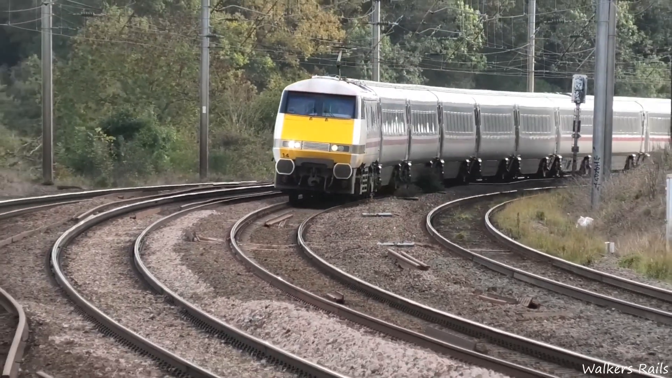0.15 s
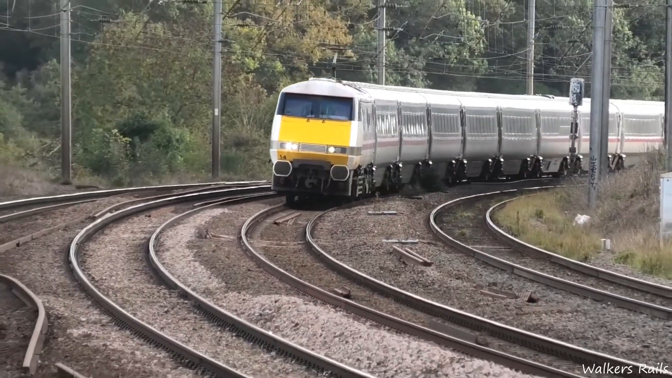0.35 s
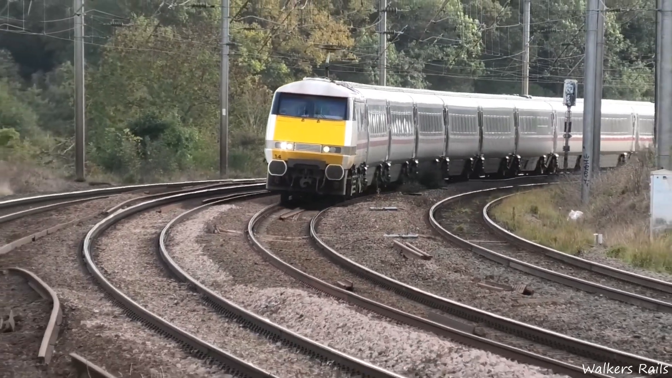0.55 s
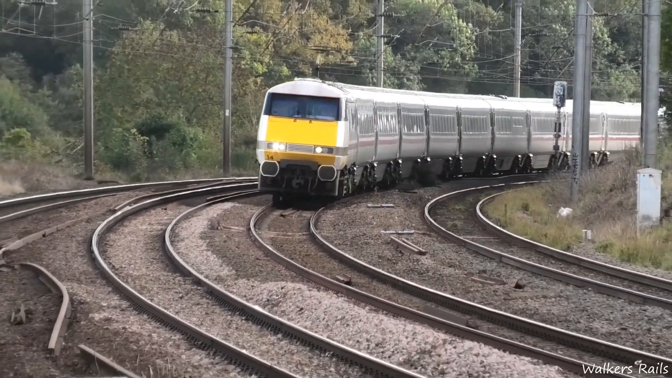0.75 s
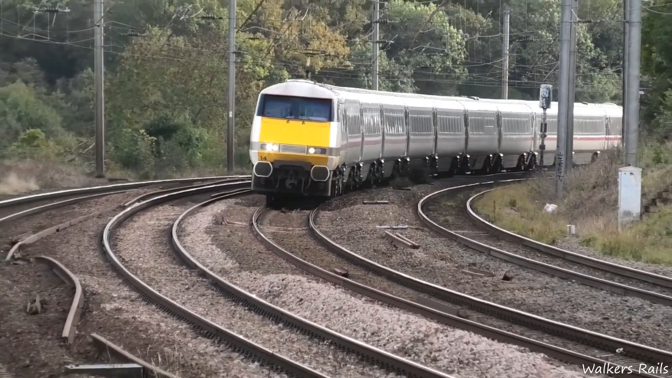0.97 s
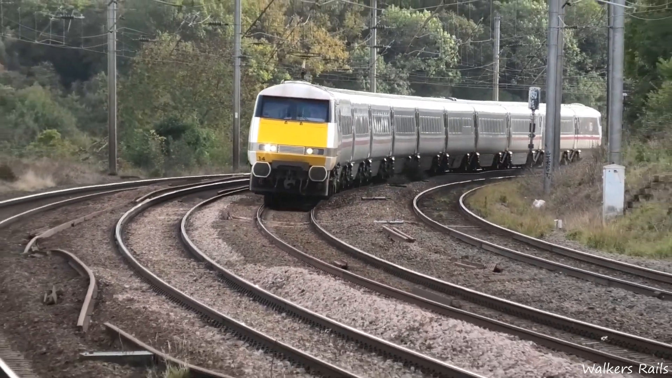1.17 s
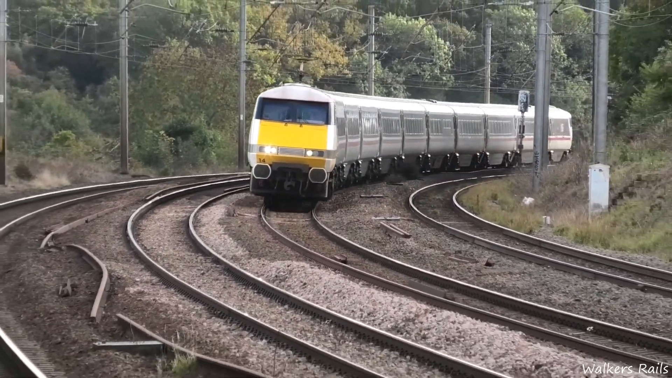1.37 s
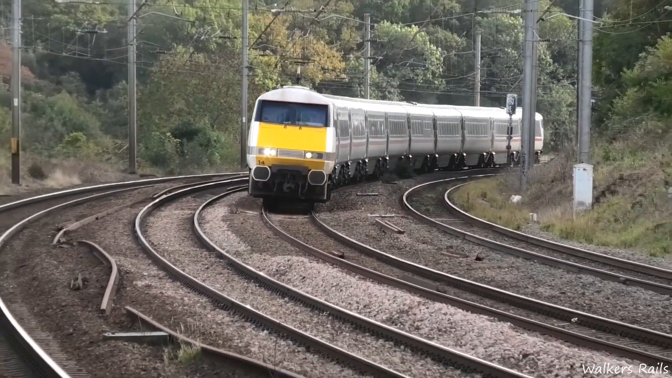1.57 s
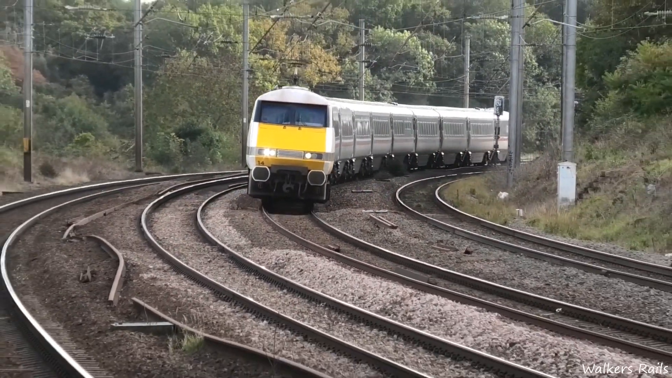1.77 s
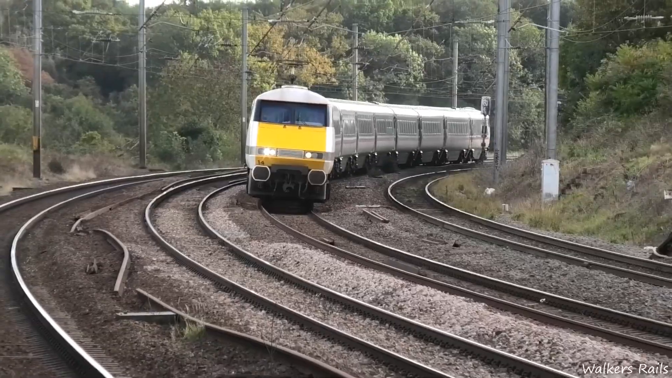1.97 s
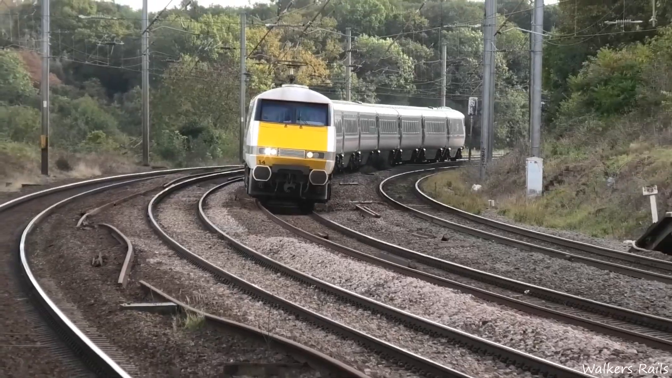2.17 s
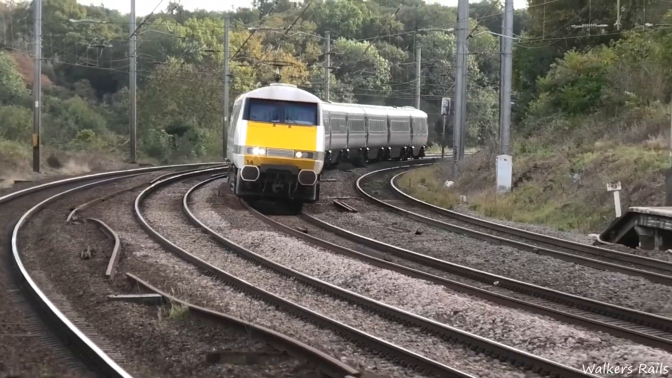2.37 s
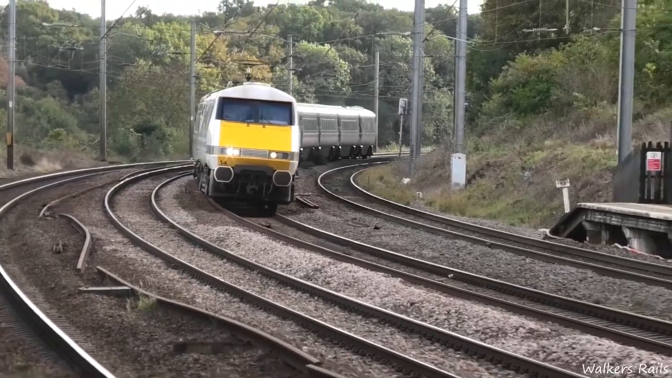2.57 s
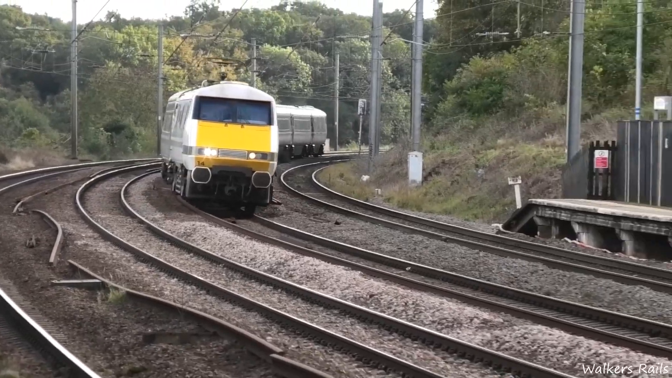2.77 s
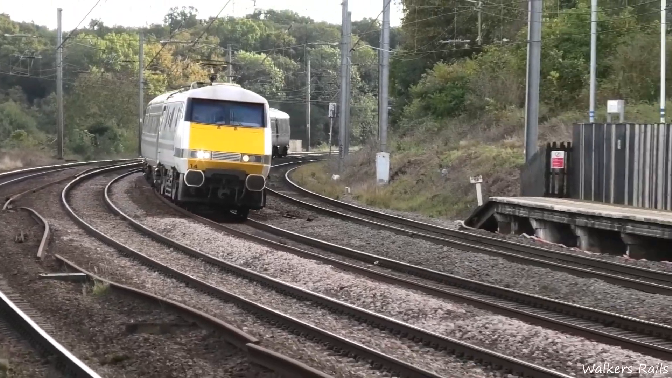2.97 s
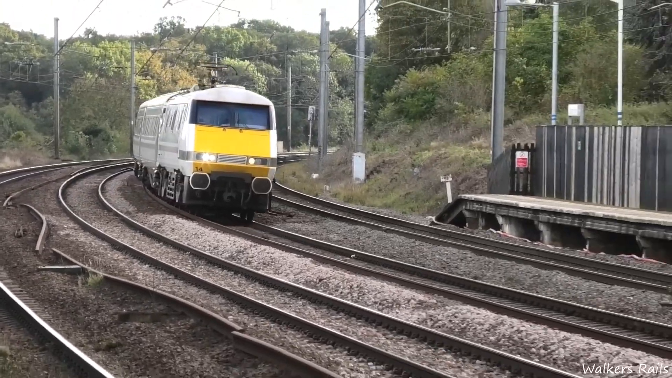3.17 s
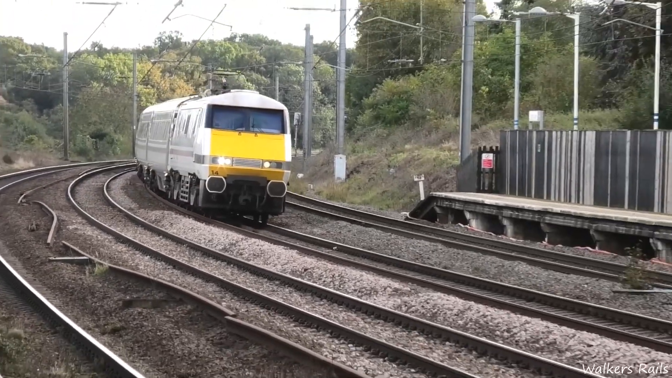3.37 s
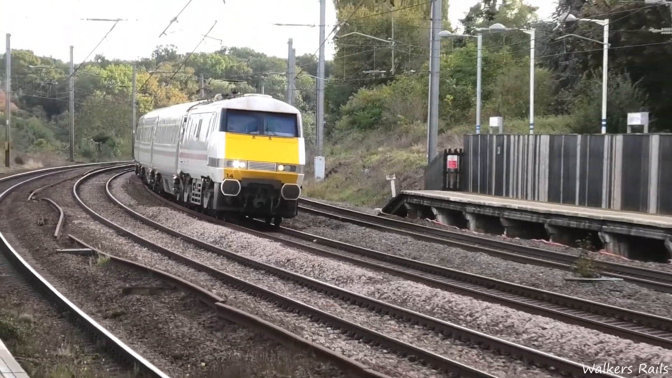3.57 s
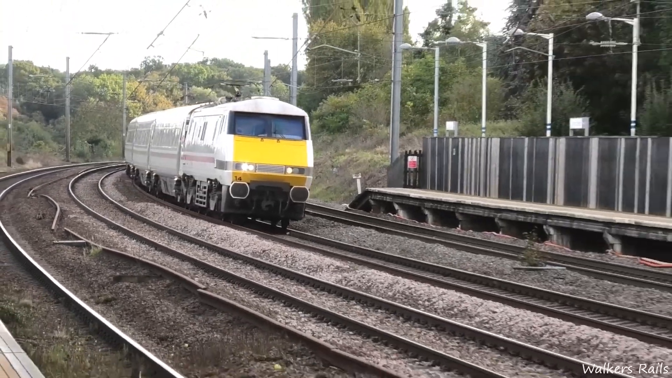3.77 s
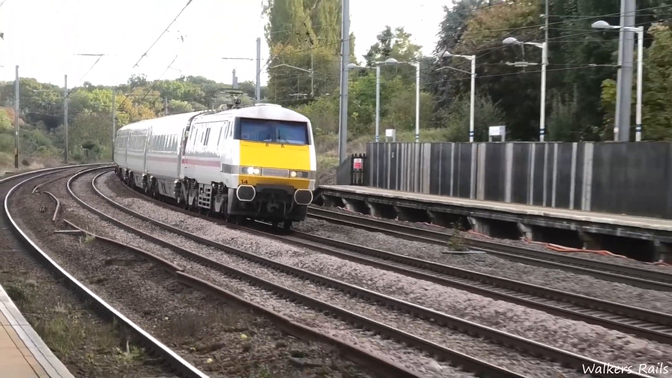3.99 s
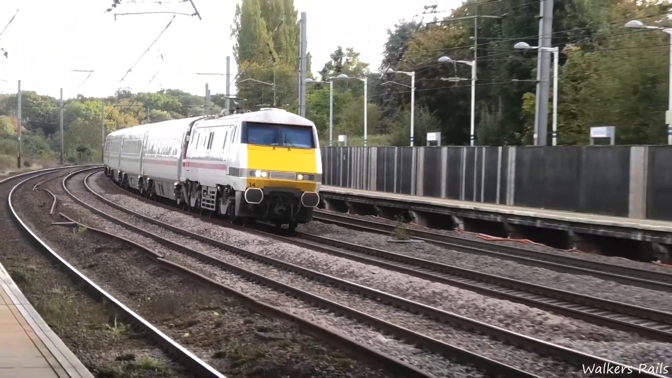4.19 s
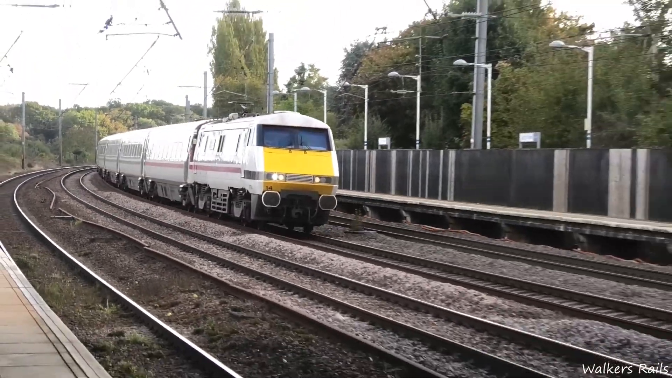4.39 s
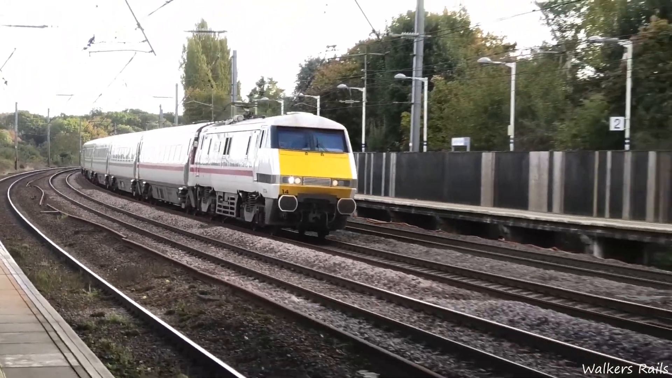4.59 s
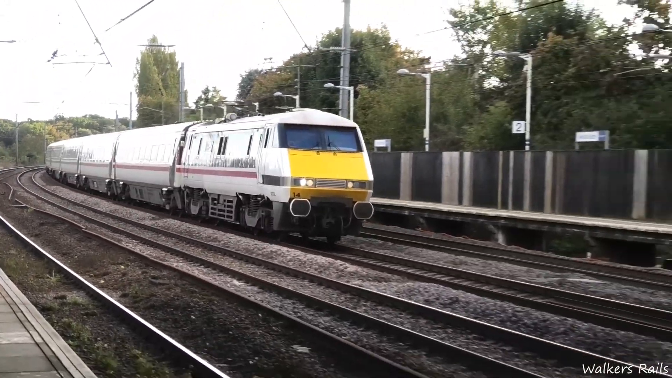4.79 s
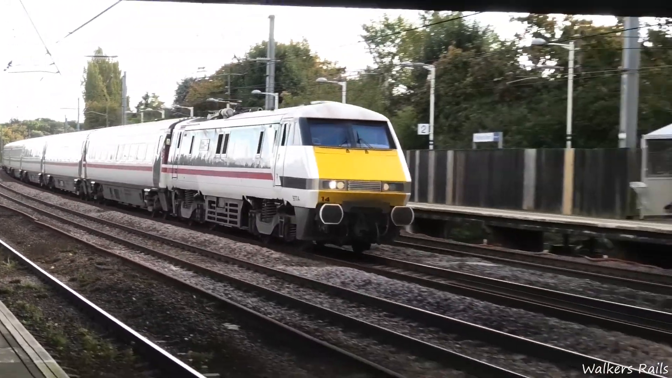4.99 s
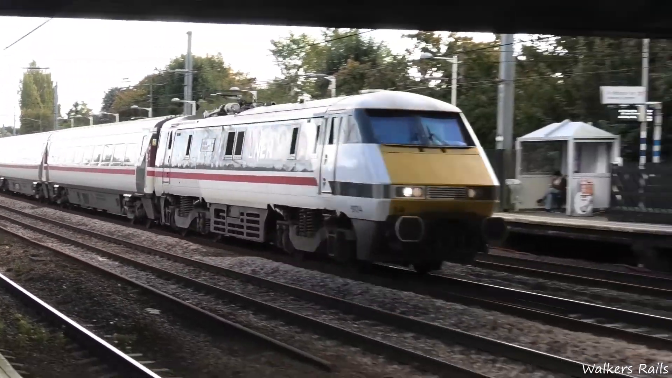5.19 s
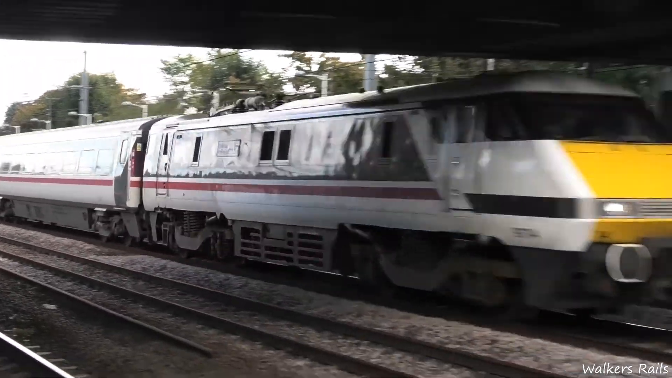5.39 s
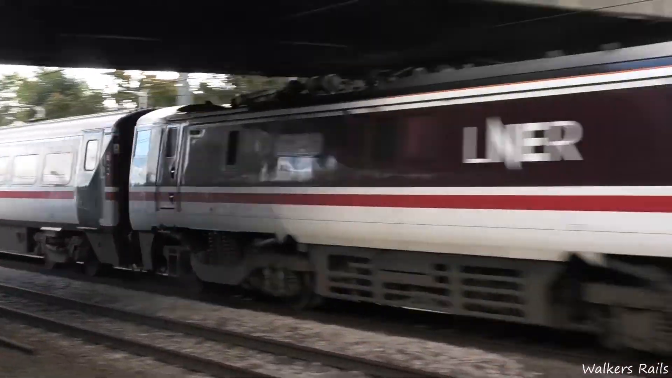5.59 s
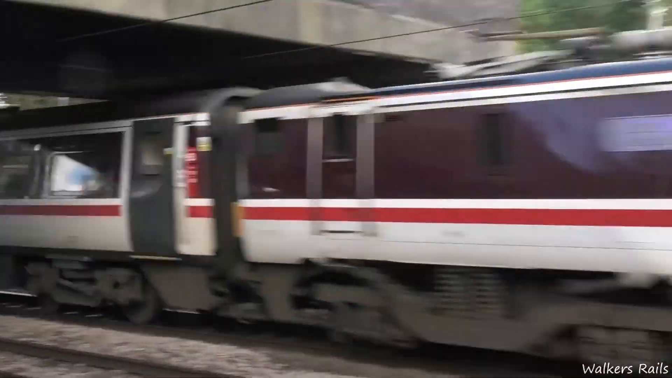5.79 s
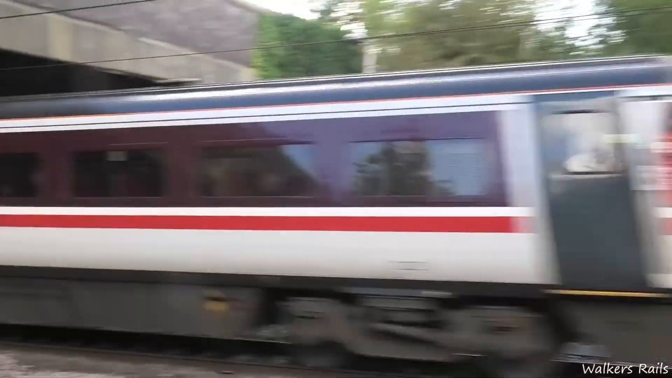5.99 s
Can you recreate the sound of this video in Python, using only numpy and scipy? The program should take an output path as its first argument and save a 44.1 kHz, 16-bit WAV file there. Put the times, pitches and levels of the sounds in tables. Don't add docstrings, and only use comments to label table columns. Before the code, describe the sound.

A distant rail hum and low rumble build into a loud, overloading rush as an express train sweeps by very close, its wheel tones dropping.

```python
import sys
import numpy as np
from scipy import signal
from scipy.io import wavfile
from scipy.ndimage import uniform_filter1d

SR = 44100
rng = np.random.default_rng(int(sys.argv[2]) if len(sys.argv) > 2 else 0)


def attenuation_scalar(level_db):
    decades = np.asarray(level_db, float) / 20
    return 10 ** decades


def store_pcm(level_fs):
    pcm = np.round(np.clip(level_fs, -1, 1) * 32767).astype(np.int16)
    wavfile.write(sys.argv[1], SR, np.atleast_2d(pcm).T)


N = 266364
TIME = np.arange(N) / SR
FRAME, HOP = 2048, 512
STEADY = 0.3


def set_rms(x, db):
    return x * attenuation_scalar(db) / np.sqrt(np.mean(x ** 2))


def swell(t, length_s):
    return np.exp(-0.5 * ((TIME - t) / (0.43 * length_s)) ** 2)


def walk(rate_hz, count):
    hold = int(SR / rate_hz / HOP) + 1
    steps = rng.standard_normal((count, N // HOP // hold + 3))
    x = np.repeat(steps, hold, axis=1)
    x = uniform_filter1d(uniform_filter1d(x, hold, axis=1), hold, axis=1)
    return x[:, :N // HOP + 3] / x.std()


def coloured(spectrum, lo_hz, hi_hz, patchy_db, flicker_db, loss_db_per_khz=None):
    hz, t, z = signal.stft(rng.standard_normal(N), SR, nperseg=FRAME, noverlap=FRAME - HOP)
    f, db = np.transpose(spectrum)
    db = np.interp(np.log(hz + 1), np.log(f), db)
    inside = (hz > lo_hz) & (hz < hi_hz)
    db -= 10 * np.log10(np.sum(attenuation_scalar(2 * db[inside])) / len(hz))
    band = (np.sqrt(hz) / 5).astype(int)
    wander = patchy_db * walk(6, count=30) + flicker_db * walk(20, count=30)
    db = db[:, None] + wander[band, :len(t)]
    if loss_db_per_khz is not None:
        khz_above = hz / 1000 - lo_hz / 500
        db = db - np.outer(khz_above, np.interp(t, TIME, loss_db_per_khz))
    return signal.istft(z * attenuation_scalar(db), SR, nperseg=FRAME, noverlap=FRAME - HOP)[1][:N]


def resonance(hz, width_hz, steady):
    step = 16
    sos = signal.butter(3, width_hz / 2, fs=SR / step, output="sos")
    slow = signal.sosfilt(sos, rng.standard_normal((2, 2 * N // step)))
    slow = slow[:, -(N // step + 2):]
    slow = slow / (np.hypot(*slow) + 1e-9) ** steady
    a, b = (np.interp(TIME, np.arange(len(v)) * step / SR, v) for v in slow)
    phase = 2 * np.pi * np.cumsum(hz * np.ones(N)) / SR
    return set_rms(a * np.cos(phase) + b * np.sin(phase), 0)


def heard(alongside_db, arrives_s, spread_db, shade_db_per_m, floor_db, surges=()):
    speed_m_s, platform_m = 38.55, 8.36
    metres = np.hypot(speed_m_s * np.maximum(arrives_s - TIME, 0), platform_m)
    db = alongside_db - spread_db * np.log10(metres / platform_m)
    db = db - shade_db_per_m * (metres - platform_m)
    db = 10 * np.log10(attenuation_scalar(2 * db) + attenuation_scalar(2 * floor_db))
    return db + sum(lift_db * swell(t, length_s) for t, length_s, lift_db in surges)


def facing():
    return swell(2.77, 1.73)


def fields():
    # [f/Hz, level/dB per Hz]
    murmur = [(13, -45), (22, -9), (76, -22), (222, -26), (285, -1), (493, 16.5), (649, -8), (854, -25),
              (1480, -30), (2870, -10), (4230, -44), (5200, -63), (6760, -81), (11400, -120)]
    return set_rms(coloured(murmur, 22, 15000, patchy_db=1.0, flicker_db=0.51), -44.5)


def sparks():
    # [t/s, length/s, f/Hz, width/Hz, level/dB]
    arcs = [
        (3.111, .04, 13000, 4000, -78),
        (3.21, .035, 13500, 4000, -75),
        (3.385, .09, 13100, 500, -75),
        (3.375, .07, 13000, 4500, -76),
    ]
    out = 0
    for t, length_s, hz, width_hz, db in arcs:
        sos = signal.butter(2, [hz - width_hz / 2, hz + width_hz / 2], "band", fs=SR, output="sos")
        hiss = set_rms(signal.sosfilt(sos, rng.standard_normal(N)), db)
        out = out + swell(t, length_s) * hiss
    return out


def wire():
    # [f/Hz, level/dB per Hz]
    hiss = [(3060, -36), (5200, -12), (6200, -1), (6900, 1.5), (7200, 4), (7320, -8), (7900, -13),
            (10300, -19), (11300, -19), (13000, -14), (15500, -21)]
    db = heard(alongside_db=-38, arrives_s=5.75, spread_db=21, shade_db_per_m=0.05, floor_db=-95)
    db = db + 7 * facing()
    return attenuation_scalar(np.minimum(db - 2.5, -48)) * coloured(hiss, 6150, 7400, patchy_db=0.6, flicker_db=1.5)


def air_rush():
    # [f/Hz, level/dB per Hz]
    rush = [(350, -28), (600, 5.5), (850, 7), (1200, 1.5), (1700, -1), (2240, 0), (2830, -9), (4400, -11),
            (5340, -16.5), (8640, -20), (10500, -25.5), (12000, -32), (15500, -40)]
    # [t/s, length/s, lift/dB]
    gusts = [
        (3.3, 0.75, 3.5),
        (4.0, 1.7, 4.2),
        (4.8, .3, 1.4),
        (5.42, 0.18, 1.4),
        (5.69, 0.089, 1.6),
        (5.92, .1, 1),
    ]
    db = heard(alongside_db=-35, arrives_s=5.75, spread_db=21.5, shade_db_per_m=0.23, floor_db=-89,
               surges=gusts)
    loss = 0.0093 * (db.max() - db)
    return attenuation_scalar(db) * coloured(rush, 6380, 11000, 0.95, 1.3, loss)


def ground_thud():
    # [f/Hz, level/dB per Hz]
    ground = [(12, -41), (22, -8.5), (35, -11), (55, -8), (75, -7.5), (100, -14.5), (180, -92)]
    # [t/s, length/s, lift/dB]
    bumps = [
        (.75, .25, -3),
        (2.73, .12, 4),
        (4.19, .12, 6),
        (4.5, 1.4, 3),
        (4.75, .2, 4),
        (5.32, 0.088, 5),
        (5.86, .3, 5.5),
    ]
    db = heard(alongside_db=-27.5, arrives_s=5.5, spread_db=60, shade_db_per_m=1, floor_db=-56,
               surges=bumps)
    thud = coloured(ground, 22, 65, patchy_db=0.55, flicker_db=0.3)
    thin = signal.sosfilt(signal.butter(2, 52, "high", fs=SR, output="sos"), thud)
    near = np.clip((db + 48) / 12, 0, 1)
    return attenuation_scalar(db) * ((1 - near) * thud + 1.06 * near * thin)


def bogie_rumble():
    # [f/Hz, level/dB per Hz]
    rumble = [(35, -46), (60, -40), (81, 0.5), (124, 4.5), (178, 4), (204, 0.5), (230, -7.5), (300, -0.5),
              (510, -120)]
    # [t/s, length/s, lift/dB]
    jolts = [
        (.99, .1, 5.5),
        (2.84, 0.092, 5),
        (3.55, .1, 6.5),
        (3.73, 0.089, 8),
        (4.27, 0.14, -2.5),
        (4.72, 0.18, -5),
        (4.93, .1, 1),
        (5.17, 0.13, -2),
        (5.62, .12, 1.5),
        (5.91, .1, -5),
    ]
    db = heard(alongside_db=-20, arrives_s=5.5, spread_db=10, shade_db_per_m=0.32, floor_db=-53.5,
               surges=jolts)
    return attenuation_scalar(db) * coloured(rumble, 70, 200, patchy_db=0.6, flicker_db=1.0)


def rails():
    # [f/Hz, level/dB per Hz]
    roar = [(88, -48), (150, -12), (226, -6), (350, 1), (504, -2.06), (794, -6), (1040, -7), (1550, -12),
            (1750, -15.5), (2880, -15.5), (3400, -20), (4200, -26), (4700, -37.5), (5500, -66)]
    # [f/Hz, width/Hz, level/dB against the roar, family number]
    modes = [(435, 91, -9, 0), (496, 61, -10, 0), (929.4, 26.4, -12, 1), (955, 32.5, -14.5, 1),
             (1538, 19, -23, 2), (1800, 8.5, -25, 2), (1870, 12.6, -24, 2), (2025, 9.3, -33, 2),
             (2422, 24, -21.5, 3), (2610, 170, -23.5, 3), (7100, 28, -50, 1)]
    # [family number, t/s, length/s, level/dB]
    turns = [(0, .1, .8, 0.5), (0, .85, .8, 4.5), (0, 2.3, 2.6, -1.5), (0, 3.39, .7, 1.6),
             (0, 4.05, .5, -2.5), (0, 5.42, .3, -2), (1, 0.81, .7, -7.5), (1, 1.77, 0.93, 0),
             (1, 2.75, 0.91, 3), (1, 3.88, 1.16, 4), (1, 5.06, 1.3, 1), (2, 2.4, 1.9, .3), (2, 4, 1.1, 1.8),
             (2, 4.9, .9, 1.5), (2, 7, .3, -3), (3, 0.85, .5, -0.5), (3, 1.85, 0.65, 1), (3, 2.6, 1.7, 2.5),
             (3, 3.6, .7, -4), (3, 5.08, .9, -2)]
    # [t/s, factor]
    doppler = [
        (0, 1.0),
        (5.15, 1.0),
        (5.45, .985),
        (5.7, .95),
        (6.04, .91),
    ]
    # [t/s, length/s, lift/dB]
    surges = [
        (1.35, 0.53, 1.5),
        (2.15, 0.77, 1.36),
        (2.696, 0.61, 1.16),
        (3.2, 0.26, 1.4),
        (3.495, 0.17, -1.1),
        (3.8, 0.37, 0.7),
        (4.3, .5, 1.1),
        (4.954, 0.13, -2),
        (5.21, .12, 1),
        (6.05, .15, -2),
    ]
    db = heard(alongside_db=-10.1, arrives_s=5.62, spread_db=10.5, shade_db_per_m=0.0679, floor_db=-70,
               surges=surges)
    far_loss = 0.1 * np.maximum(-31.5 - db, 0)
    loss = 1.27 - 1.22 * facing() + far_loss
    family = np.full((4, N), attenuation_scalar(-13))
    for k, t, length_s, turn_db in turns:
        k = int(round(k))
        family[k] = np.hypot(family[k], attenuation_scalar(turn_db) * swell(t, length_s))
    factor = np.interp(TIME, *np.transpose(doppler))
    song = 0
    for hz, width_hz, mode_db, k in modes:
        tone = resonance(hz * factor, width_hz, STEADY * (width_hz < 30))
        song = song + attenuation_scalar(mode_db) * family[int(round(k))] * tone
    return attenuation_scalar(db - 2.0) * (coloured(roar, 225, 1650, 0.4, 0.82, loss) + song)


def wheels():
    # [t/s, length/s, start f/Hz, end f/Hz, level/dB]
    rings = [(5.355, 0.197, 520, 630, -20.5), (5.329, 0.22, 410, 400, -25), (5.71, .17, 2350, 2000, -23),
             (5.771, 0.14, 730, 700, -17), (5.87, 0.1, 530, 480, -12.5), (5.99, 0.13, 500, 460, -12.5),
             (5.918, 0.108, 950, 820, -16), (6.002, 0.114, 2300, 2350, -21.5),
             (5.83, 0.16, 2200, 2100, -31), (5.67, 0.1195, 1300, 950, -18.5), (5.55, 0.043, 900, 890, -22)]
    # [t/s, length/s, start f/Hz, end f/Hz, level/dB]
    howls = [
        (5.9, 0.261, 2200, 2050, -22.5),
        (5, 0.298, 850, 760, -26.5),
        (5.88, 0.21, 800, 810, -21),
        (5.66, 0.196, 850, 820, -22),
        (5.92, .2, 450, 420, -17.5),
        (5.45, 0.22, 800, 780, -21),
    ]
    out = 0
    for passing, sharpness in ((rings, 13), (howls, 4.5)):
        for t, length_s, start_hz, end_hz, db in passing:
            glide = np.interp(TIME, [t - length_s / 2, t + length_s / 2], [start_hz, end_hz])
            width_hz = start_hz / sharpness
            tone = resonance(glide, width_hz, STEADY * (width_hz < 70))
            out = out + attenuation_scalar(db) * swell(t, length_s) * tone
    return out


def scene():
    background = fields() + sparks() + wire()
    train = air_rush() + ground_thud() + bogie_rumble() + rails() + wheels()
    return (background + train)[None]


def band_limit(x):
    return signal.sosfilt(signal.butter(12, 15610, fs=SR, output="sos"), x)


def record(dry):
    # [f/Hz, level/dB per Hz]
    hiss = [(2940, -32), (5000, 3), (6510, -10), (6800, -1), (7060, -1), (7470, -11.5), (10600, -13),
            (13200, -12.5), (14300, -10), (15500, -17)]
    x = dry + set_rms(coloured(hiss, 5000, 15500, patchy_db=0.6, flicker_db=1.2), -77)
    x = x / (1 + np.abs(x / 1.25) ** 8) ** (1 / 8)
    return band_limit(np.clip(x, -1, 1))


dry = scene()
out = record(dry)
store_pcm(out)
```